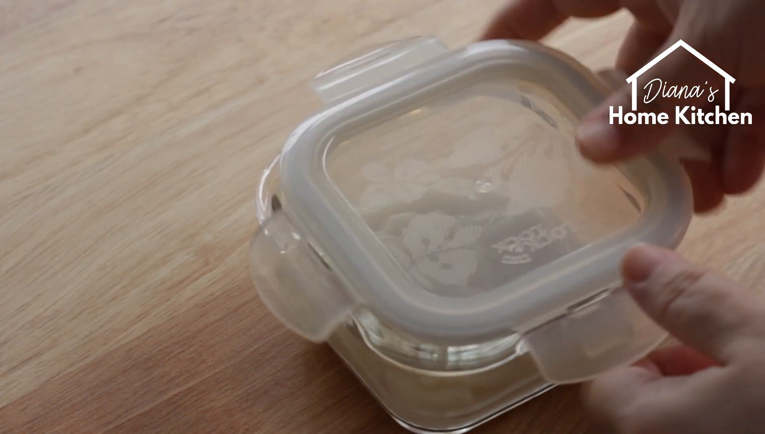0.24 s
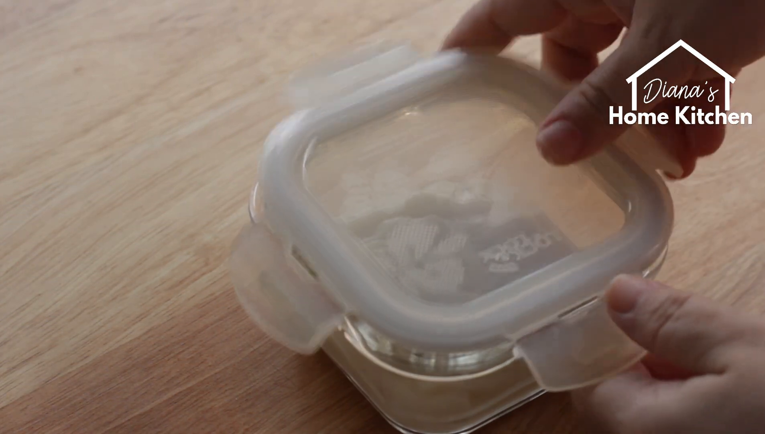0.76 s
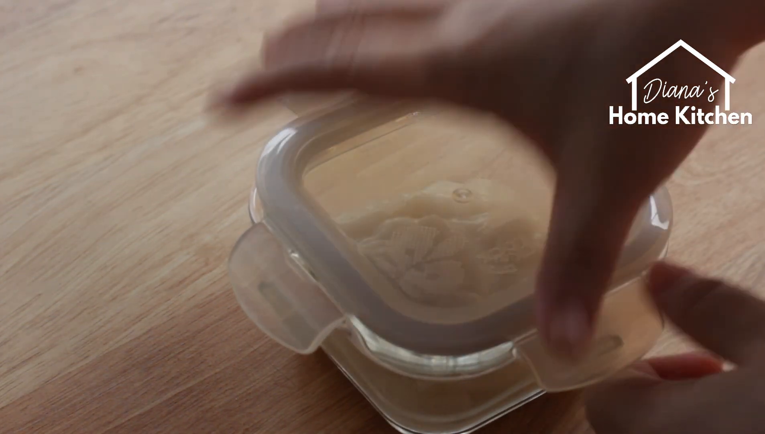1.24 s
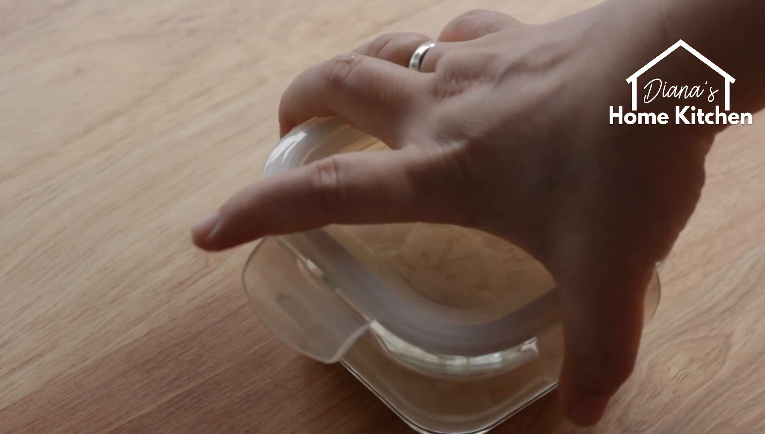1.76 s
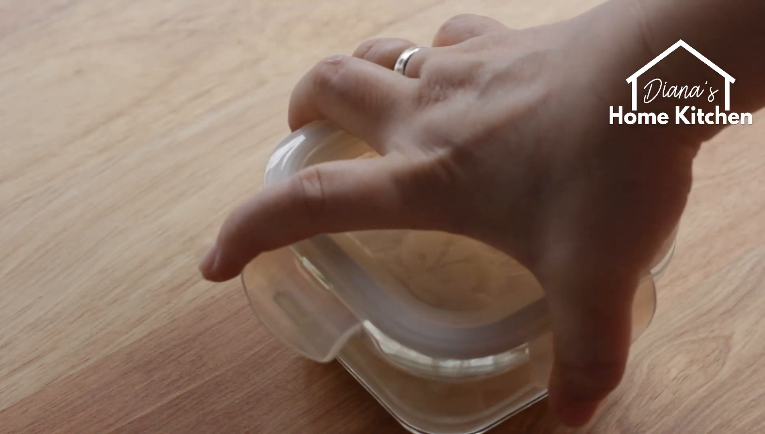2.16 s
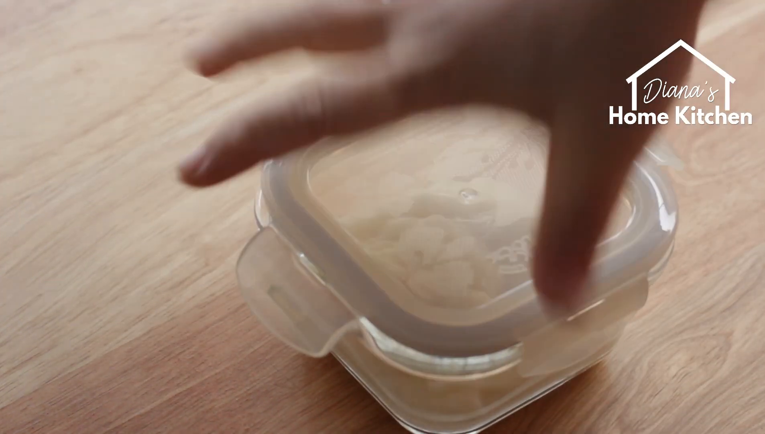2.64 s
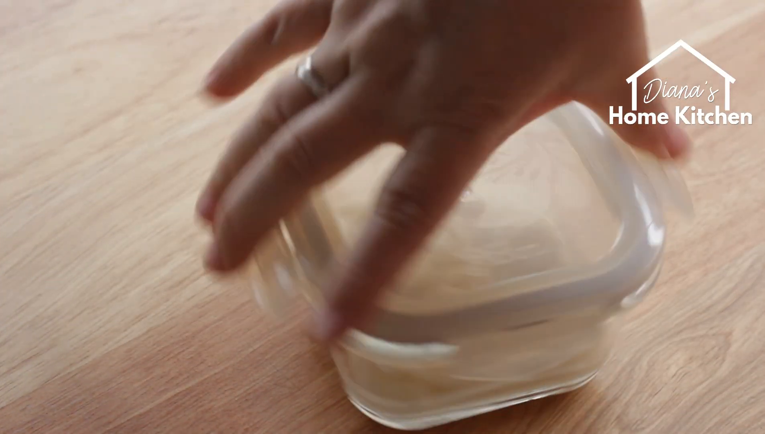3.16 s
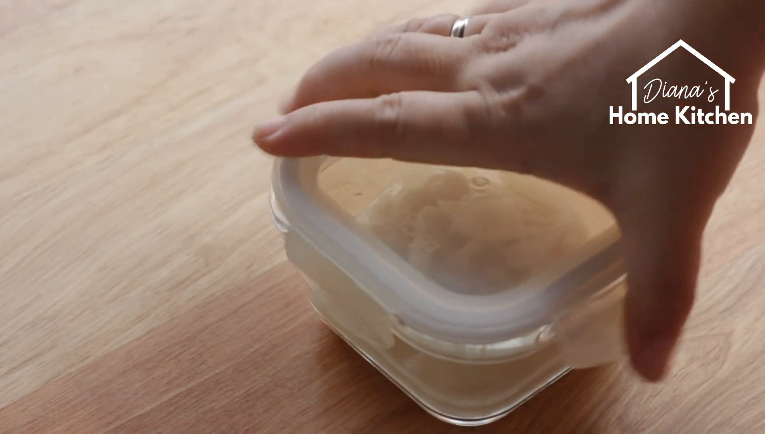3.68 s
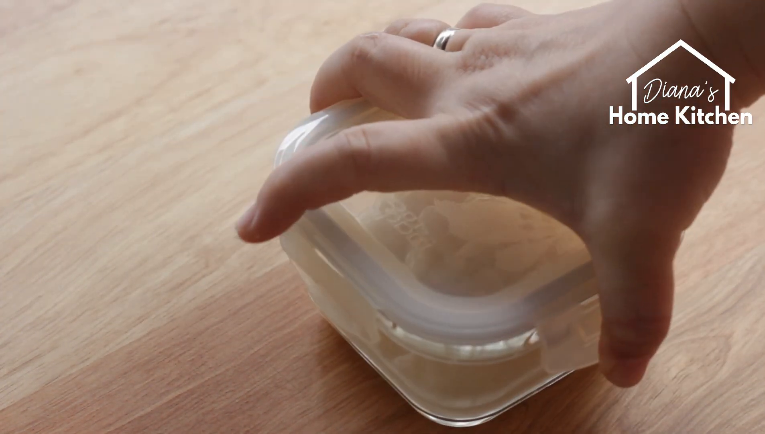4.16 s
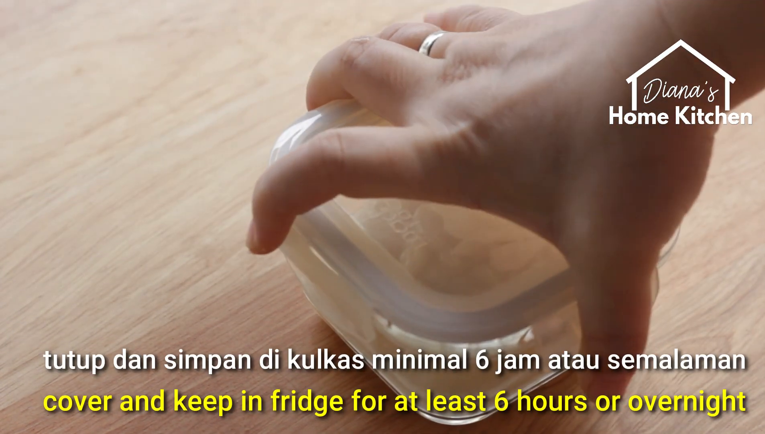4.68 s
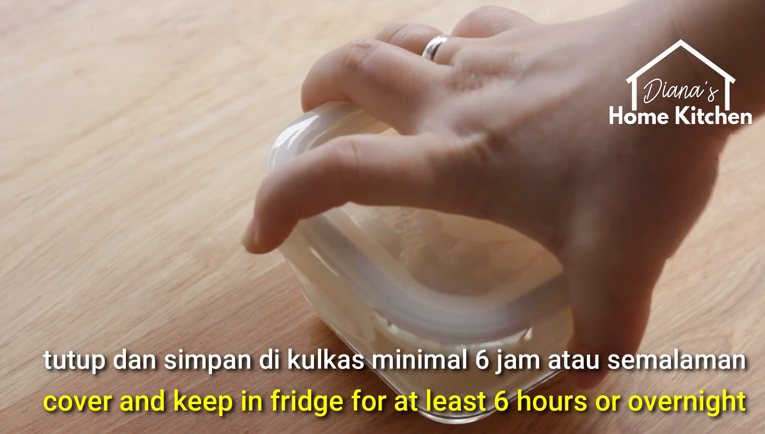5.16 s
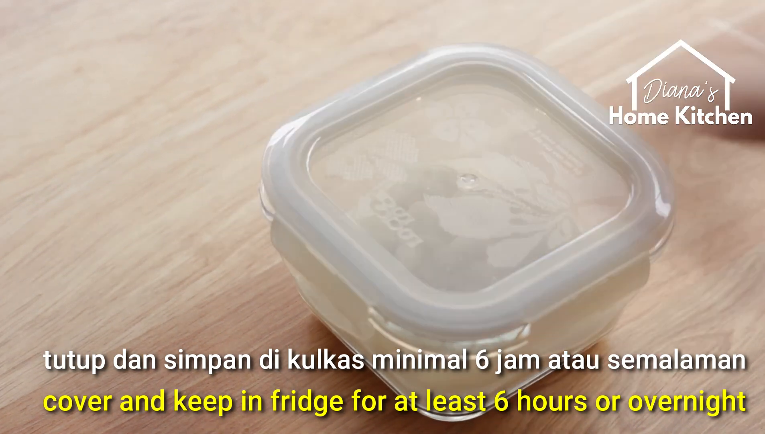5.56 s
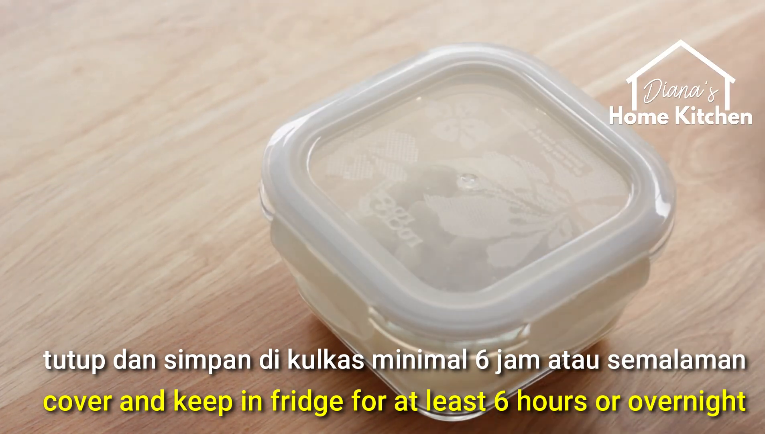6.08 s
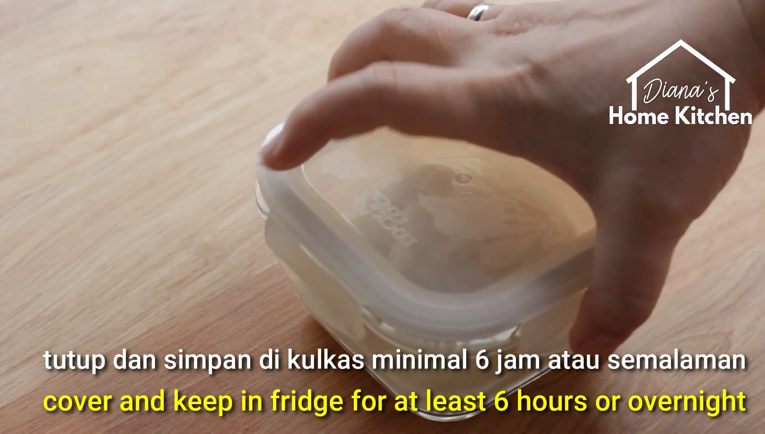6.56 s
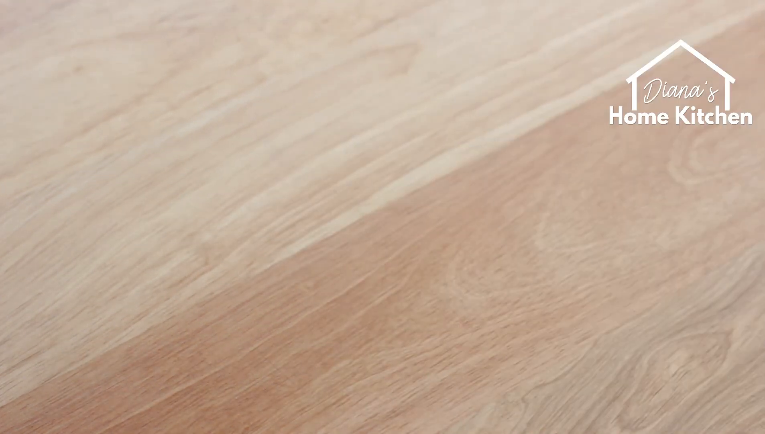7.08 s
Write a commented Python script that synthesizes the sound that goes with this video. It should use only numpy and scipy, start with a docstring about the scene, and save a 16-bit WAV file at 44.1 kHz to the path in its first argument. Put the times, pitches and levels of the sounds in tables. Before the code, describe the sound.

In a quiet, hard-walled kitchen with a low appliance hum, a plastic lid settles on a glass container with faint pings, dull knocks and a tiny scuff. Then its locking tabs snap shut: two in quick succession, a pause, a third, and a fourth a second later. Each is a sharp bright crack with a hollow lid thump and short room tail. Close microphone; a far motor hums near the end.

```python
"""Over a low hum of kitchen appliances, a plastic lid lightly touches and scuffs a glass food container.
Then four locking tabs snap shut one after another; each cracks past the rim, rings and thumps the lid.
Blows on tuned resonances make the snaps, thumps, pings and knocks; tiny random slips make the scuffs.
Echoes and a fading tail of noise make the hard-walled kitchen. Shaped noise, steady tones and fan noise
make the background, where a far motor picks up near the end, then slows and fades."""
import sys
import numpy as np
from scipy import signal
from scipy.fft import rfft, irfft
from scipy.io import wavfile

SR = 44100
rng = np.random.default_rng(int(sys.argv[2]) if len(sys.argv) > 2 else 0)


def bounce(signal):
    """Save signal as a 16-bit WAV file at the path given by the first command-line argument."""
    frames = np.transpose(np.atleast_2d(signal))
    limited = np.clip(frames, -1, 1)
    pcm = np.round(limited * 32767).astype(np.int16)
    wavfile.write(sys.argv[1], SR, pcm)


N = 323253

# resonances of each tab with its side of the lid and glass: f/Hz, width/Hz, level/dB
FIRST_TAB = [(800, 200, 9.5), (1230, 200, 10), (1880, 240, 7), (4116, 170, 22.5), (4730, 160, 5),
             (7083, 270, 12), (9900, 700, 6.5), (11200, 900, 7), (13700, 2300, 3)]
SECOND_TAB = [(1020, 220, 12), (1360, 240, 14), (2030, 280, 17), (2380, 300, 8), (4100, 600, 9),
              (5200, 450, 14), (7550, 500, 19), (8000, 450, 15), (11600, 900, 8)]
THIRD_TAB = [(770, 220, 11), (1337, 120, 1.8), (2066, 110, 2.1), (3660, 340, 5.4), (5550, 450, 7.4),
             (6700, 230, 14), (7140, 600, 14), (7960, 290, 2.4), (10160, 1900, 6.3), (14660, 3100, 3)]
FOURTH_TAB = [(960, 170, 18.9), (1380, 120, 9), (2030, 280, 20.3), (3115, 344, 12), (3770, 320, 17),
              (3980, 250, 16), (5825, 410, 11), (7160, 260, 19), (7860, 600, 13), (9600, 500, 3.1),
              (11700, 250, 2.6)]
# the four snaps: t/s, tab ring level/dB, crack level/dB, change of the direct crack with the way
# the tab faces/dB, lid thump level/dB, lid pitch f/Hz, pitch of the whole lid's flex f/Hz
SNAPS = [(2.0318, 0, 8, -1, 26.5, 533, 310), (2.3157, -2.5, 8.5, -1.5, 26.5, 479.4, 372.8),
         (3.9938, -1.5, 3.5, -4.5, 23.5, 517, 250), (4.9700, -1.5, 7.5, 1, 15.5, 543, 245)]
# spectrum of a tab's crack: f/Hz, level/dB
CRACK_SPECTRUM = [(100, -13.5), (250, 4), (700, -2.5), (2800, 1.5), (7000, 6.5), (10000, -3.5),
                  (12000, -3.5), (13200, -11), (16000, -10)]
# light touches of lid on glass: t/s, strength level/dB, plastic tick level/dB, cushioning by the seal/0-1
TOUCHES = [(.1312, -16.5, -20.5, 0.08), (.1335, -13.5, -34, 0.04), (.2145, -18, -35, 0.66),
           (.3323, -11, -53, 0.55), (0.8389, -23, -42, 0.87), (0.849, -22.5, -43, 0.99),
           (1.5222, -17.5, -50, 0.01), (1.655, -31, -50, 0.05), (3.776, -21.5, -49, 0),
           (3.779, -16.5, -39, 0.1), (4.4755, -25.5, -40, 0)]
# resonances of the glass rim: f/Hz, width/Hz, level/dB
RIM_MODES = [(1518, 690, -11), (2200, 100, 3.5), (2930, 1400, -11.5), (4020, 200, -2.5), (5200, 660, -17.5),
             (6300, 140, -14.5)]
# spectrum of the plastic edge's tick: f/Hz, level/dB
TICK_SPECTRUM = [(1000, -2.5), (4000, 3), (7000, -13), (12000, -24), (16000, -5.5)]
# the lid scuffs as it settles: t/s, fade time/s, level/dB, pitch f/Hz
SCUFFS = [(0.215, .022, -48.5, 600), (0.843, 0.027, -54.5, 400)]
# spectrum of the gritty top of a scuff: f/Hz, level/dB
GRIT_SPECTRUM = [(300, -8), (2000, -17), (5000, 5), (9000, -0.5), (14000, 3)]
# the kitchen's early echoes: delay t/s, level/dB
ECHOES = [(.0080, -20), (0.0102, -15), (0.015, -24), (0.0366, -23)]
# strength of the kitchen's tail: f/Hz, level/dB
TAIL_LEVEL = [(120, -3), (300, 2.5), (600, 4), (1000, 1), (2000, 0), (4000, -4), (8000, -5), (12000, -8.5),
              (16000, -6.5)]
# time the tail takes to fall by 60 dB: f/Hz, t/s
TAIL_T60 = [(120, 0.48), (400, 0.44), (1000, .72), (2500, .75), (4500, .73), (7500, .62), (10000, .54),
            (13000, .46), (16000, .35)]
# spectrum of the broad room noise: f/Hz, level/dB
AIR_SPECTRUM = [(20, -0.5), (32, -3), (42, -13.5), (70, -12.5), (110, -11), (170, -11.5), (300, -17),
                (500, -23.5), (900, -30), (1800, -34.5), (3200, -41), (6000, -46), (11000, -50.5),
                (13000, -47.5), (16000, -48.5)]
# steady appliance tones: f/Hz, rms level/dB
HUM_TONES = [(97, -62), (299, -74), (399, -74), (481, -75), (775, -77)]
# narrow bands of fan noise: f/Hz, width/Hz, rms level/dB
FAN_BANDS = [(26.9, 6.8, -56), (149, 29, -61.5), (776, 10, -79.5), (1455, 88, -77), (2413, 220, -78)]
# partials of the far motor: multiple of its pitch, starting level/dB, fade/dB per s
MOTOR_PARTIALS = [(2, -55.5, 3.5), (3, -55.5, 12.5), (4, -65, 10.5)]
# the recorder's treble response: f/Hz, level/dB
TREBLE_SHELF = [(11500, 0), (12800, -5), (15500, -6)]

AIR_DB = -54  # rms level
CUTOFF_HZ = 15900
# a fully cushioned touch rings the rim less, and its knock is stronger and deeper
SEAL_RING_DB = -9
BARE_KNOCK_DB, CUSHIONED_KNOCK_DB = 3, 28.5
BARE_KNOCK_HZ, CUSHIONED_KNOCK_HZ = 908, 403
MOTOR_START_S, MOTOR_ATTACK_S = 5.76, 0.19
MOTOR_HZ, MOTOR_SAG_HZ_PER_S = 68.1, 0.97
MOTOR_WAVER_HZ, MOTOR_WAVER_DEPTH = 2.86, 0.23


def tabs(ring_tilt_db, low_cut_hz, direct):
    """Each tab cracks over the rim and rings briefly; its ring and bass depend on where one listens from."""
    out = np.zeros(N)
    low_cut = signal.butter(1, low_cut_hz, "high", fs=SR, output="sos")
    crack = signal.sosfilt(low_cut, click(CRACK_SPECTRUM))
    tab_modes = [FIRST_TAB, SECOND_TAB, THIRD_TAB, FOURTH_TAB]
    for (s, ring_db, crack_db, facing_db, *_), modes in zip(SNAPS, tab_modes):
        ring = from_db(ring_db + ring_tilt_db) * strike(modes)
        # the tilt strengthens the ring and weakens the crack, or the reverse
        heard_crack_db = crack_db - ring_tilt_db + direct * facing_db
        snap = ring + from_db(heard_crack_db) * crack
        add(out, s, scatter(snap, transit_s=0.00025))
    return out


def lid_thumps(width_hz, flex_db, soft_hz):
    """Each snap drums the flat lid and, lower and weaker, flexes all of it; the hand damps the top."""
    out = np.zeros(N)
    for s, *_, thump_db, hz, flex_hz in SNAPS:
        modes = [(hz, width_hz, thump_db), (flex_hz, width_hz, thump_db + flex_db)]
        add(out, s, strike(modes))
    return signal.sosfilt(signal.cheby1(2, 1, soft_hz, fs=SR, output="sos"), out)


def touches():
    """Light contacts make the glass rim ping, less so through the seal, and the plastic edge tick."""
    out = np.zeros(N)
    for s, db, tick_db, cushion in TOUCHES:
        ping = from_db(db + cushion * SEAL_RING_DB) * strike(RIM_MODES)
        tick = from_db(tick_db) * click(TICK_SPECTRUM)
        add(out, s, scatter(ping + tick, transit_s=0.00029))
    return out


def knocks(width_hz, soft_hz, flex_hz, flex_db):
    """The more the seal takes a touch, the deeper and stronger its dull knock and the louder the low flex."""
    out = np.zeros(N)
    for s, db, _, cushion in TOUCHES:
        hz = BARE_KNOCK_HZ * (CUSHIONED_KNOCK_HZ / BARE_KNOCK_HZ) ** cushion
        knock_db = db + BARE_KNOCK_DB + cushion * (CUSHIONED_KNOCK_DB - BARE_KNOCK_DB)
        knock = strike([(hz, width_hz, knock_db)])
        flex = cushion * strike([(flex_hz, width_hz, knock_db + flex_db)])
        add(out, s, knock - flex)  # the flex starts the opposite way
    return signal.sosfilt(signal.butter(2, soft_hz, fs=SR, output="sos"), out)


def scuffs(slips_per_s, width_hz, grit_db, size=8000):
    """The seal drags over the rim in tiny random slips that die away, with a faint gritty top."""
    out = np.zeros(N)
    t = np.arange(size) / SR
    for s, fade_s, db, hz in SCUFFS:
        slips = rng.standard_normal(size) * (rng.random(size) < slips_per_s / SR)
        body = rms_one(resonate(resonate(slips, hz, width_hz), hz, width_hz))
        grit = from_db(grit_db) * rms_one(colour(slips, GRIT_SPECTRUM))
        fade = np.exp(-t / fade_s) * (1 - t / t[-1])
        add(out, s, from_db(db) * (body + grit) * fade)
    return out


def click(spectrum, size=6000):
    """A bare contact is a very short pulse with a broad spectrum."""
    # colouring spreads the pulse both ways in time; keep only the half after the contact
    return colour(signal.unit_impulse(size), spectrum) * (np.arange(size) < size / 2)


def strike(modes, size=6000):
    """One blow sets every resonance ringing, and each dies away at its own pace."""
    blow = signal.unit_impulse(size) + 1e-18  # the tiny offset avoids slow, near-zero arithmetic
    return sum(from_db(db) * resonate(blow, hz, width_hz) for hz, width_hz, db in modes)


def scatter(x, transit_s, feedback=0.55, count=7):
    """Bending waves run to and fro in the plastic, smearing a pulse into a short crackle of the same colour."""
    shares = np.geomspace(0.2, 1, count) * rng.uniform(0.8, 1.2, count)
    for share in shares:
        gap = np.zeros(int(share * transit_s * SR))
        loop = np.r_[1, gap, feedback * rng.choice([-1, 1])]
        x = signal.lfilter(loop[::-1], loop, x)  # spreads in time, leaves every pitch equally loud
    return x


def kitchen(x):
    """Hard walls give a few distinct echoes, then a dense tail whose length depends on pitch."""
    t = np.arange(SR) / SR
    # hands and counter scatter a little at once, the walls fill in after 10 ms
    swell = np.interp(t, [0, 0.002, 0.006, 0.0105], [0, 0.45, 0.45, 1])
    white = rfft(rng.standard_normal(SR))
    bins_hz = np.arange(SR // 2 + 1)
    edges_hz = np.linspace(80 ** 0.5, 18000 ** 0.5, 60) ** 2
    response = np.zeros(SR)
    for low, high in zip(edges_hz, edges_hz[1:]):
        hz = np.sqrt(low * high)
        noise = irfft(white * ((bins_hz >= low) & (bins_hz < high)), SR)
        band = noise * swell * from_db(-60 * t / at_hz(TAIL_T60, hz))
        even_gain = np.sqrt(2 * (high - low) / SR)  # wider bands carry more energy
        response += band / np.linalg.norm(band) * even_gain * from_db(at_hz(TAIL_LEVEL, hz))
    for delay_s, db in ECHOES:
        response[round(delay_s * SR)] += from_db(db)
    return signal.fftconvolve(x, response)[:N]


def background():
    """Shaped noise is the room air, sine tones the appliance hum; a fan and a far motor join them."""
    t = np.arange(N) / SR
    air = from_db(AIR_DB) * rms_one(colour(rng.standard_normal(N), AIR_SPECTRUM))
    hum = np.zeros(N)
    for hz, db in HUM_TONES:
        hum += from_db(db) * np.sqrt(2) * np.sin(2 * np.pi * (hz * t + rng.random()))
    fan = narrow_noise(FAN_BANDS)
    return air + hum + fan + motor()


def motor():
    """A far motor comes up quickly, then slows and fades; each partial wavers and fades at its own rate."""
    age = np.maximum(np.arange(N) / SR - MOTOR_START_S, 0)
    turns = np.cumsum(MOTOR_HZ - MOTOR_SAG_HZ_PER_S * age) / SR
    out = np.zeros(N)
    for multiple, db, fade_db_per_s in MOTOR_PARTIALS:
        waver = 1 + MOTOR_WAVER_DEPTH * narrow_noise([(MOTOR_WAVER_HZ, MOTOR_WAVER_HZ, 0)])
        tone = np.sqrt(2) * np.sin(2 * np.pi * multiple * turns)
        out += from_db(db - fade_db_per_s * age) * waver * tone
    return out * np.minimum(age / MOTOR_ATTACK_S, 1)


def narrow_noise(bands):
    """Noise passed twice through each resonance becomes a wavering tone."""
    out = np.zeros(N)
    for hz, width_hz, db in bands:
        once = resonate(rng.standard_normal(N + SR), hz, width_hz)
        twice = resonate(once, hz, width_hz)
        out += from_db(db) * rms_one(twice[SR:])  # drop the first second, while it builds up
    return out


def resonate(x, hz, width_hz):
    """One resonance favours one pitch, with a gain of about 1 there; a narrower one rings longer."""
    r = np.exp(-np.pi * width_hz / SR)
    feed = np.array([1, 0, -1]) * (1 - r * r) / 2
    return signal.lfilter(feed, [1, -2 * r * np.cos(2 * np.pi * hz / SR), r * r], x)


def colour(x, spectrum):
    """Make each pitch in a sound louder or softer by a spectrum table."""
    hz = np.arange(len(x) // 2 + 1) * SR / len(x)
    return irfft(rfft(x) * from_db(at_hz(spectrum, hz)), len(x))


def at_hz(points, hz):
    """Read a table between its points, on a log-frequency axis."""
    known_hz, values = np.transpose(points)
    return np.interp(np.log(np.maximum(hz, 1)), np.log(known_hz), values)


def from_db(db):
    """Turn decibels into gain."""
    return 10 ** (np.asarray(db) / 20)


def rms_one(x):
    """Scale a sound to an rms level of 1."""
    return x / np.sqrt(np.mean(x ** 2) + 1e-20)


def add(track, s, sound):
    """Mix a sound into a track at a time in seconds."""
    start = round(s * SR)
    track[start:start + len(sound)] += sound[:N - start]


def scene():
    """The tabs beam their ring at the microphone; the room gets a broader crack and little dull sound."""
    direct_tabs = tabs(ring_tilt_db=2.0, low_cut_hz=440, direct=True)
    room_tabs = tabs(ring_tilt_db=-1.5, low_cut_hz=60, direct=False)
    thumps = lid_thumps(width_hz=80, flex_db=-10.5, soft_hz=543)
    light = touches() + scuffs(slips_per_s=1500, width_hz=520, grit_db=-17)
    seating = knocks(width_hz=76, soft_hz=1210, flex_hz=290, flex_db=-3.5)
    room = kitchen(room_tabs + light + from_db(-9) * thumps + from_db(-10) * seating)
    return (direct_tabs + thumps + light + seating + room + background())[None]


def record(dry):
    """Peaks that overload the input are clipped; the highest treble is shelved down, then cut."""
    clipped = np.clip(dry[0], -1, 1)
    shelved = colour(clipped, TREBLE_SHELF)[None]
    return signal.sosfilt(signal.ellip(10, 0.1, 70, CUTOFF_HZ, fs=SR, output="sos"), shelved)


dry = scene()
out = record(dry)
bounce(out)
```